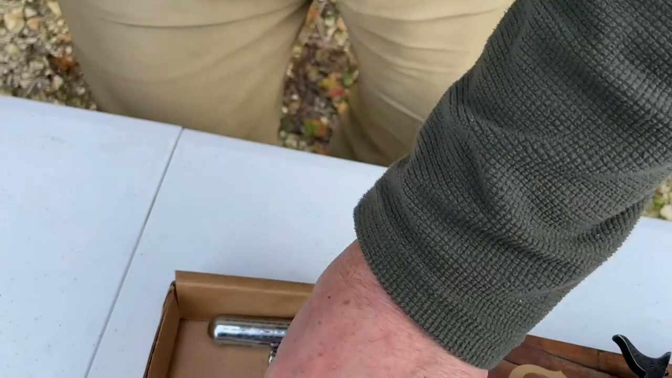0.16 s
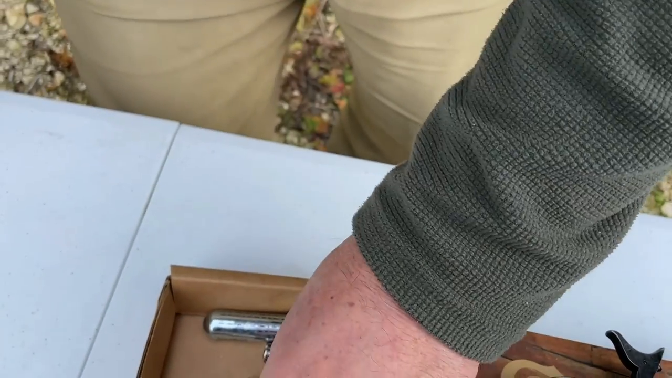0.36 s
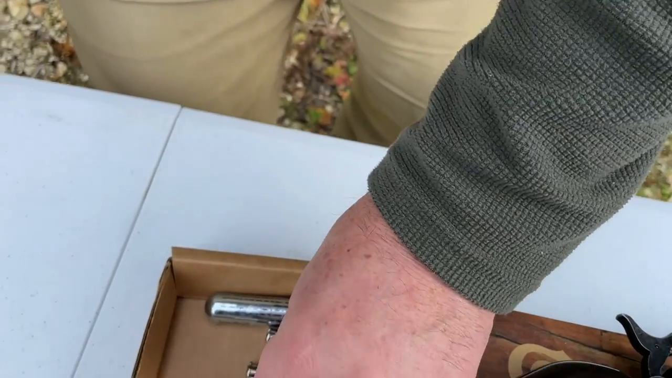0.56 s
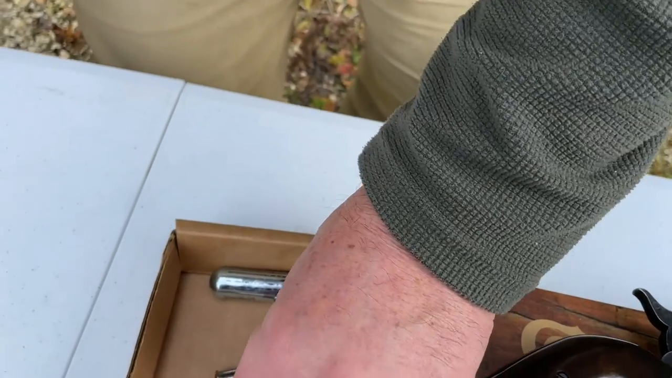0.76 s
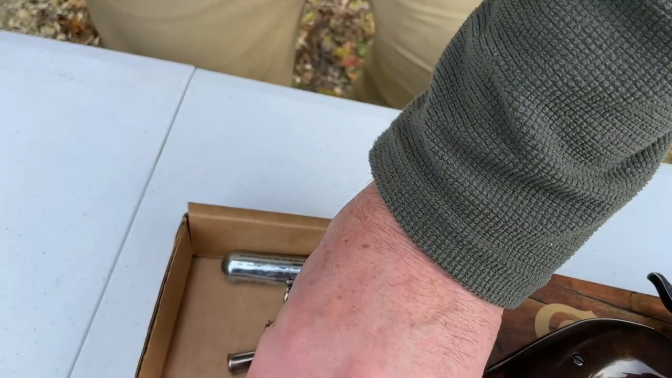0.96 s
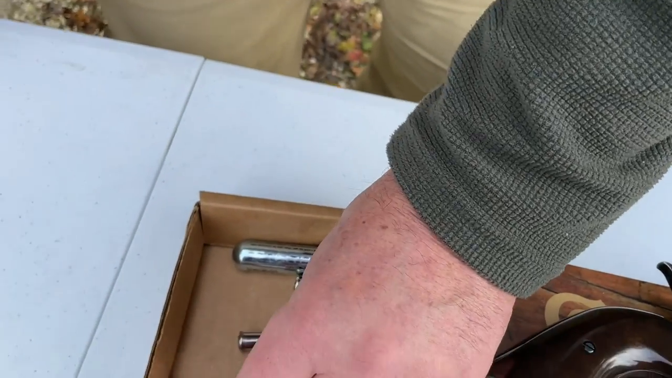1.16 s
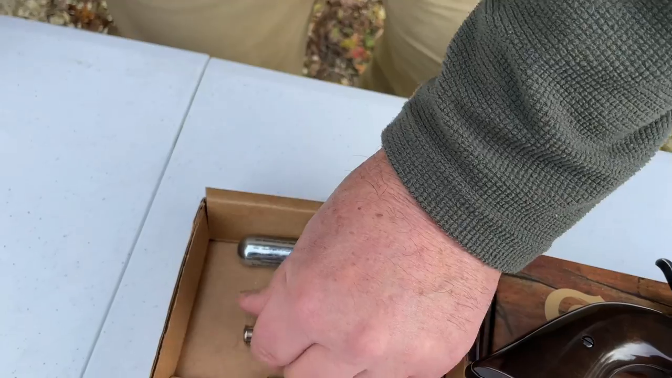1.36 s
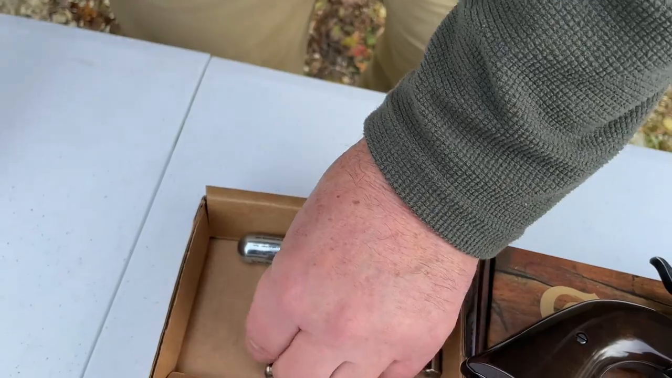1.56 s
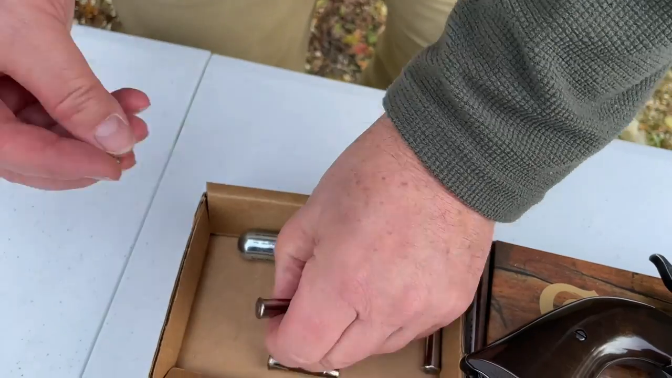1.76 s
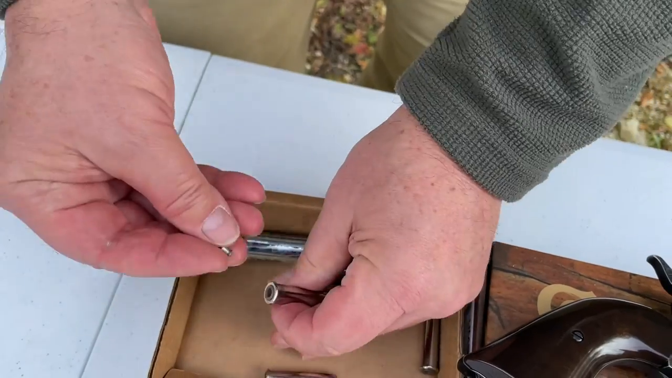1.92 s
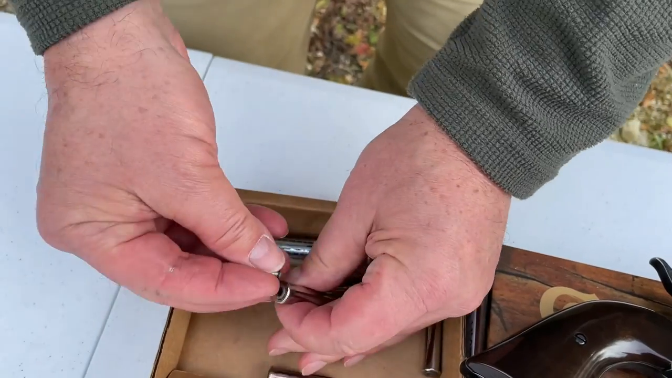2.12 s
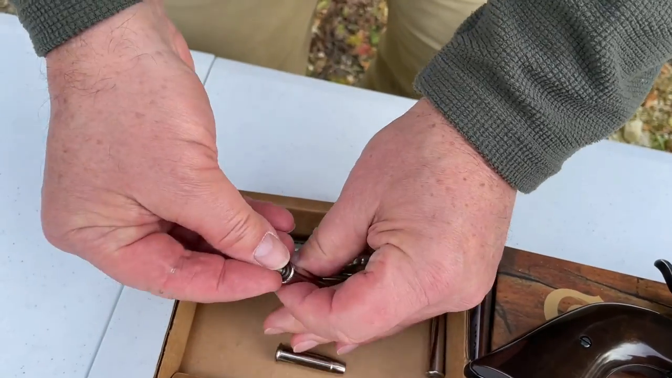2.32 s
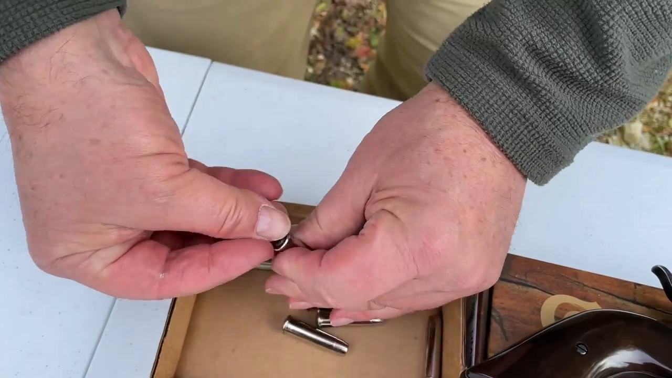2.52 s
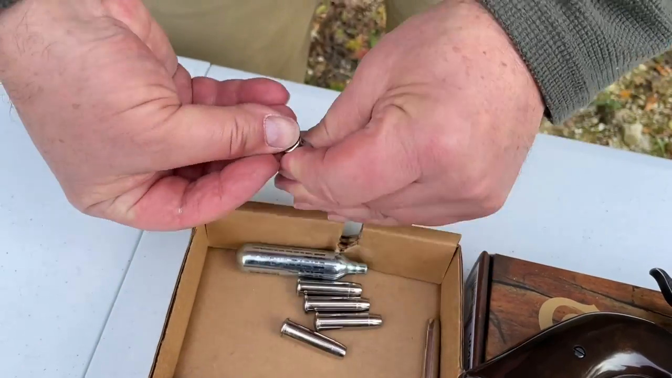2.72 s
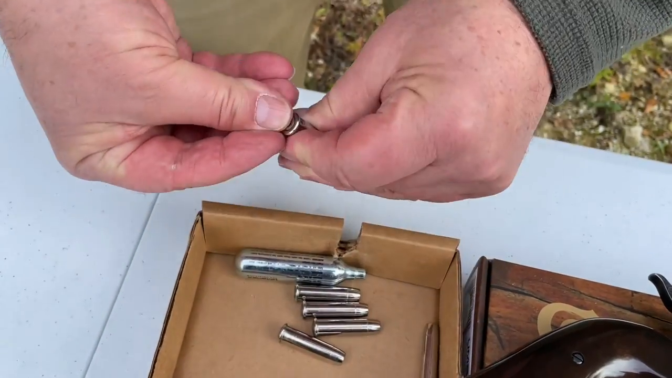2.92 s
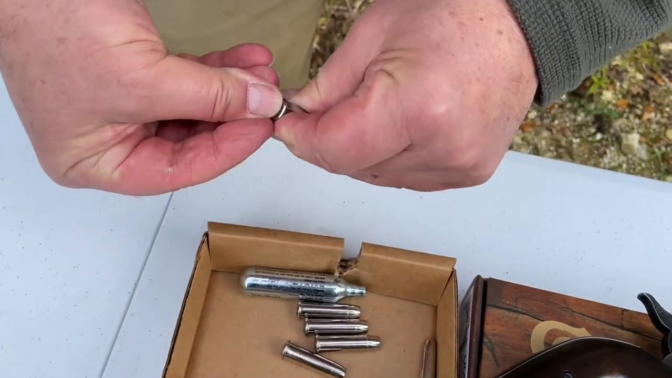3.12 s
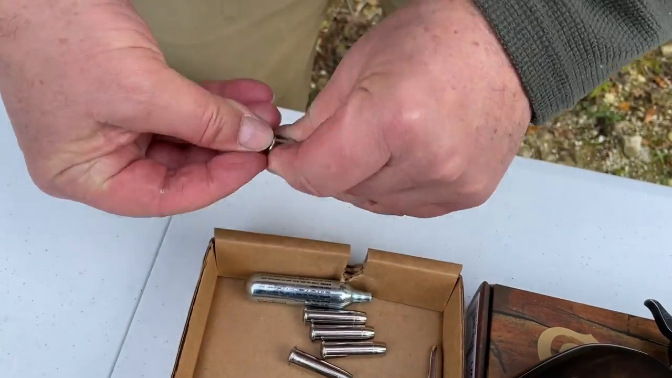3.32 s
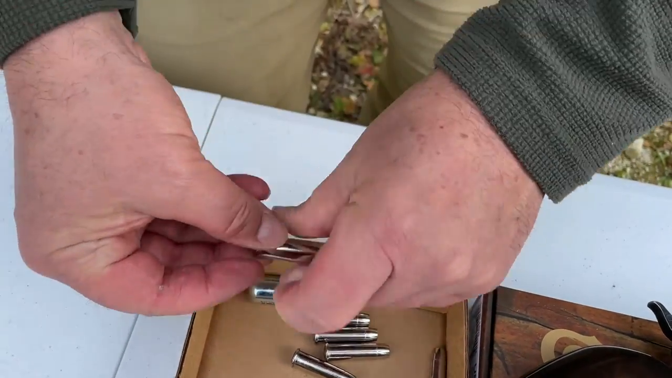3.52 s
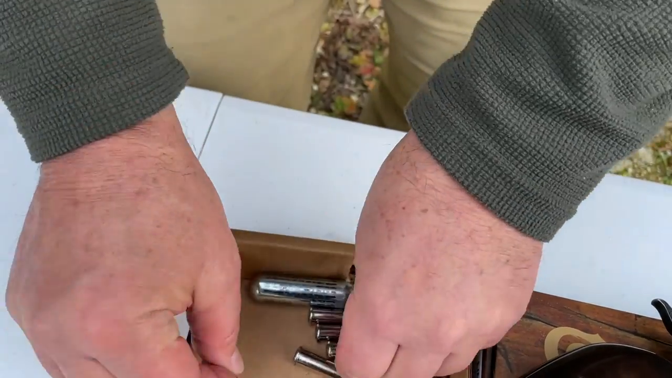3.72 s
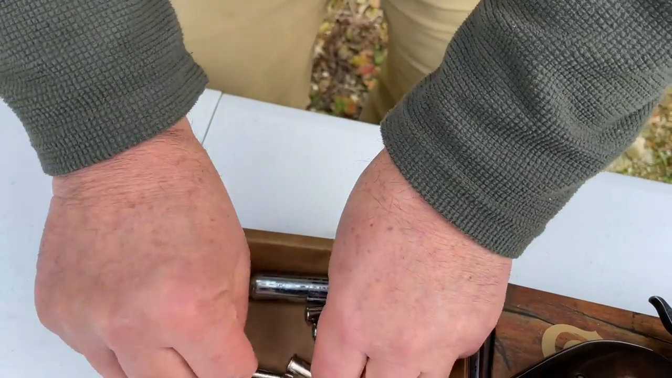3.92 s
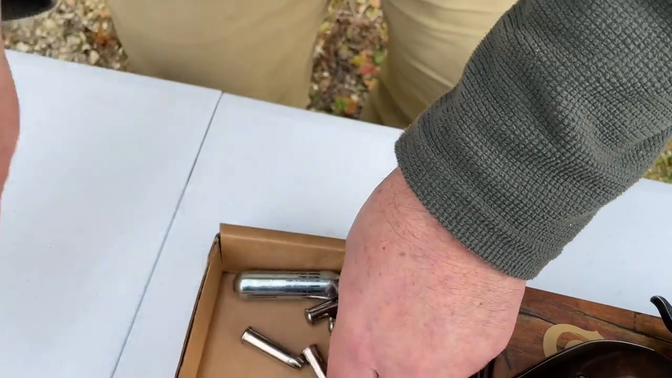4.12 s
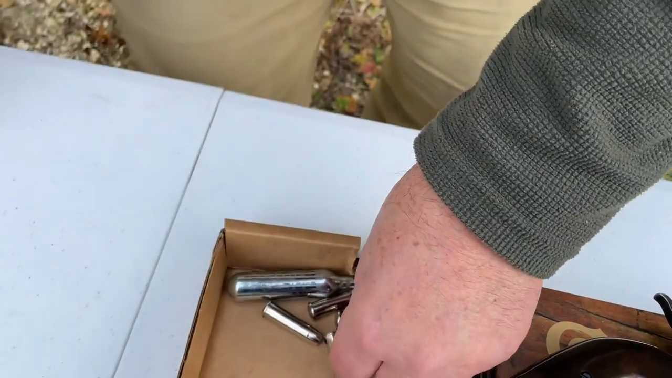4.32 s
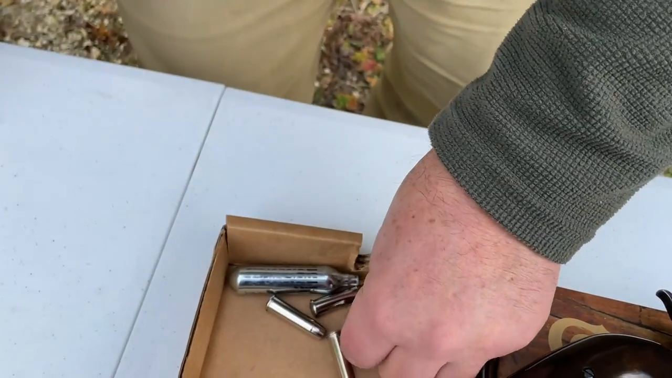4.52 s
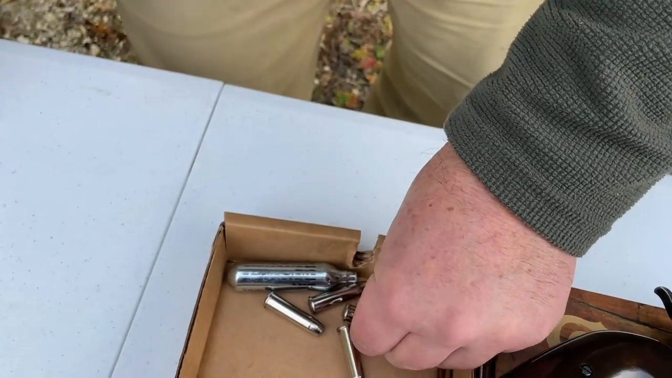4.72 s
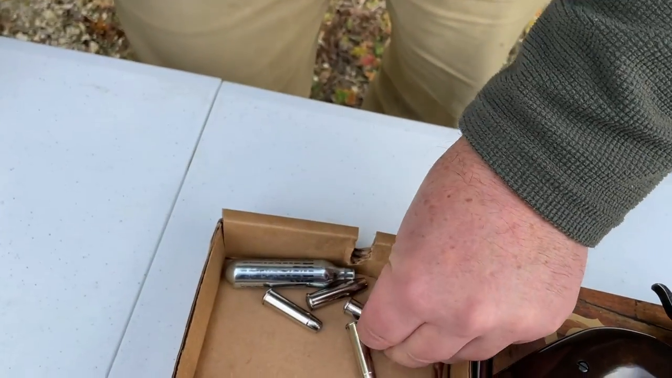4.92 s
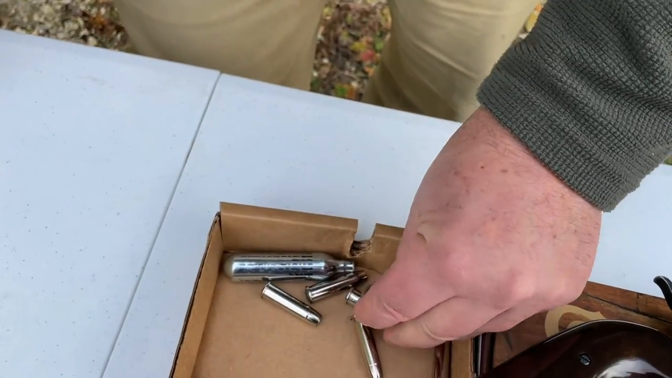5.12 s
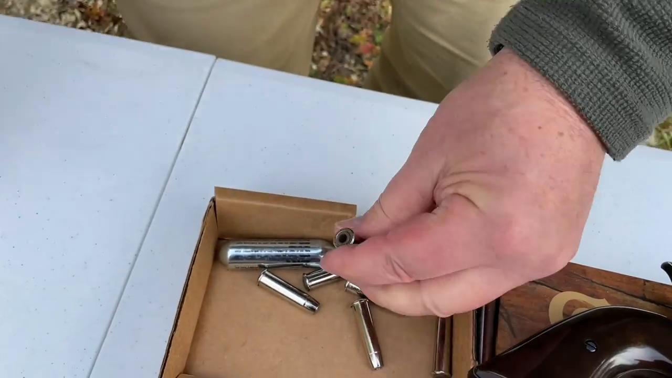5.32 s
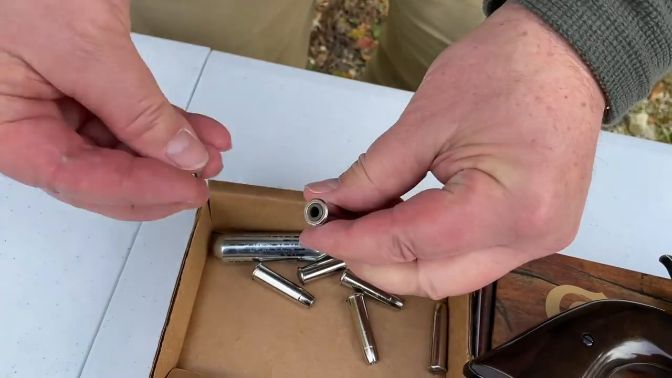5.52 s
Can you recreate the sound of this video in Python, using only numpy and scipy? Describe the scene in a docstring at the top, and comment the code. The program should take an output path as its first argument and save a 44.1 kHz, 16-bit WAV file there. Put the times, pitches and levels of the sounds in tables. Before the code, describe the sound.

Fingers sort thin metal cases in a cardboard box: gritty drags, sharp rim snaps, hollow thumps and high, short ringing clinks over faint outdoor air.

```python
"""Metal cartridge cases clink on one bright shell tone, knock on a cardboard box and scrape across its floor.
Fingers pick over them on a plastic table outdoors, with a faint wash and light air on the microphone behind.
Clinks are dying sines with a noisy contact tick; knocks ring box and table modes with a dull thud and rumble.
Scrapes are coloured trains of tiny slips, smooth when fast and bunched when slow; caught rims snap.
The background is coloured noise in a low and a high band."""
import sys
import numpy as np
from scipy import signal
from scipy.fft import rfft, irfft, next_fast_len
from scipy.io import wavfile
from scipy.ndimage import uniform_filter1d

SR = 44100
rng = np.random.default_rng(int(sys.argv[2]) if len(sys.argv) > 2 else 0)


def waveform_to_disk(signal):
    """Save audio, clipped to [-1, 1], as 16-bit WAV at the path in sys.argv[1]."""
    frames = np.transpose(np.atleast_2d(signal))
    scaled = np.clip(frames, -1, 1) * 32767
    samples = np.round(scaled).astype(np.int16)
    wavfile.write(sys.argv[1], SR, samples)


N = 250114
TIME = np.arange(N) / SR
CUTOFF_HZ = 17000

# cases set down on the box floor:
# t/s, box level/dB, table level/dB, contact hardness/(dB per octave), rim snap level/dB
KNOCKS = [(.970, -33, -29, -1, -40), (1.0633, -17, -24.5, -6, -22.5), (1.0872, -1.5, -18, 0, -10.5),
          (1.475, -30, -25.5, 5.5, -26), (1.599, -27.5, -25.5, -2.5, -30), (2.42, -36, -30, -6.5, -45),
          (2.471, -28.5, -29.5, -5.5, -30), (3.788, -20.5, -14.5, 7, -22), (3.815, -29, -24, 9, -36),
          (3.8877, -8, -11.5, -1.5, -7), (3.9338, -10.5, -29, -1, -7.5), (3.957, -15.5, -42, 0, -21),
          (4.1577, -19.5, -20, 8, -21), (4.3631, -29, -23, -3, -9), (4.397, -33, -31, 9, -13),
          (4.7019, -13.5, -18.5, -5.5, -14), (4.710, -16.5, -28, -4.5, -18), (4.753, -26.5, -23.5, -5, -31),
          (4.819, -23, -32, 3.5, -20), (5.0691, -17.5, -35, 1, -8.5)]
# two long drags over the cardboard, speed given as rasp level: t/s, level/dB
FIRST_DRAG = [(0, -34.5), (.06, -31.5), (.2, -31), (.24, -25), (.28, -28.5), (.35, -40.5), (.5, -40.5),
              (.56, -53), (.665, -39.5), (.74, -60)]
SECOND_DRAG = [(4.33, -50), (4.39, -43), (4.44, -28), (4.56, -30), (4.66, -35.5), (4.71, -34.5),
               (4.78, -41), (4.84, -33), (4.90, -60)]


def from_db(db):
    """Decibels to gain."""
    return 10 ** (np.asarray(db) / 20)


def rms_one(x):
    """Scale to rms 1."""
    return x / np.sqrt(np.mean(x ** 2) + 1e-20)


def add(track, s, sound):
    """Mix a sound into a track at time s."""
    at = max(round(s * SR), 0)
    track[at:at + len(sound)] += sound[:N - at]


def drift(rate):
    """Smooth random wander of rms 1, through a new random value `rate` times a second."""
    return rms_one(np.interp(TIME * rate, np.arange(3000), rng.standard_normal(3000)))


def colour(x, spectrum, tilt_db=0):
    """Causal (minimum-phase) filter through the spectrum's points, tilted about 4 kHz."""
    size = 2 * next_fast_len(len(x))
    hz = np.maximum(np.arange(size // 2 + 1) * SR / size, 1)
    points = np.array(spectrum)
    db = np.interp(np.log(hz), np.log(points[:, 0]), points[:, 1])
    db = db + tilt_db * np.tanh(np.log(hz / 4000))
    # folding the cepstrum forward in time gives the minimum phase
    cepstrum = irfft(np.log(from_db(db)))[:size // 2]
    cepstrum[1:] *= 2
    response = np.exp(rfft(cepstrum, size))
    return irfft(rfft(x, size) * response)[:len(x)]


def decay(t, t60):
    """Exponential fade, 60 dB down after t60 seconds."""
    return from_db(-60 * t / t60)


def mode(t, hz, t60):
    """A struck mode: a dying sine."""
    return np.sin(2 * np.pi * hz * t) * decay(t, t60)


def contact(spectrum, tilt_db, crush, crush_t60, tail_db, tail_t60):
    """A sharp contact, a few ms of crushing, and a scatter off the box walls, at one fixed energy."""
    t = TIME[:4096]
    scatter = from_db(tail_db) * decay(t, tail_t60)
    rise = 1 - np.exp(-t / 0.00031)
    push = rng.standard_normal(len(t)) * crush * (decay(t, crush_t60) + scatter) * rise
    push[10] += 1
    # level out the push's own spectrum, so the material alone sets the colour
    hz = np.geomspace(100, CUTOFF_HZ, 64)
    power = uniform_filter1d(np.abs(rfft(push)) ** 2, size=60)
    uneven_db = 10 * np.log10(np.interp(hz * len(t) / SR, np.arange(len(power)), power))
    even_push = colour(push, np.column_stack([hz, -uneven_db]))
    sound = colour(even_push, spectrum, tilt_db)
    return 3 * sound / np.linalg.norm(sound)


def outdoors():
    """Coloured noise split at 300 Hz: lumpy low air on the microphone under an even, distant wash."""
    # background colour: f/Hz, level/dB (relative within each band)
    background_colour = [(14, -0.5), (30, -10), (50, -15), (100, -18), (130, -20.5), (175, -18),
                         (260, -23.5), (380, -33.5), (620, -33), (800, -28.5), (1050, -30.5), (4000, -39.5),
                         (9400, -43.5), (12500, -56)]
    # low air on the microphone: t/s, level/dB
    air_level = [(0, -35), (.7, -35), (1.3, -34.5), (2.5, -40.5), (3.3, -39.5), (4.25, -33.5), (5.2, -37.5),
                 (5.67, -36.5)]
    # distant outdoor wash: t/s, level/dB
    wash_level = [(0, -42), (.85, -43.5), (1.95, -45), (2.9, -48), (3.6, -48), (4.1, -44), (5.3, -48)]
    noise = colour(rng.standard_normal(N), background_colour)
    low = signal.sosfilt(signal.butter(2, 300, "low", fs=SR, output="sos"), noise)
    high = signal.sosfilt(signal.butter(2, 300, "high", fs=SR, output="sos"), noise)
    air_db = np.interp(TIME, *np.transpose(air_level)) + 1.65 * drift(17)
    wash_db = np.interp(TIME, *np.transpose(wash_level))
    # the bands meet in opposite phase, so the wash is subtracted
    return rms_one(low) * from_db(air_db) - rms_one(high) * from_db(wash_db)


def grains(per_s, spread_db):
    """Tiny slips of uneven size and random sign."""
    sizes = from_db(spread_db * np.minimum(rng.exponential(1, N), 4.5)) * rng.choice([-1, 1], N)
    return sizes * (rng.random(N) < per_s / SR)


def drags():
    """Metal slides over paper fibres in tiny slips, which bunch up as the slide slows."""
    # colour of the rasp of case on cardboard: f/Hz, level/dB (relative)
    rasp_colour = [(150, -0.5), (1400, -11), (2000, -3.5), (2550, 1), (3200, -4), (3650, 0), (4200, -8.5),
                   (5050, 0), (5950, -4), (6600, -2.5), (9000, -19), (16000, -41.5)]
    # colour of the fine, bright grit: f/Hz, level/dB (relative)
    grit_colour = [(500, -24), (4500, -21.5), (7000, -2), (9800, 2), (12000, -13), (16000, -19.5)]
    # brief nudges: t/s of the fastest moment, length/s, rasp level/dB, grit against rasp level/dB
    nudges = [(1.495, .17, -44, -1.5), (1.985, 0.064, -46, -2.5), (4.15, 0.23, -40.5, -6)]
    nudge_swell_db, nudge_stick_db = 15.5, 6
    first_grit_db, second_grit_db = -5.5, -3  # fine grit against the rasp
    first_smooth_db, second_smooth_db = -31.5, -27  # speed above which a slide runs smoothly
    stick_db_per_db, drag_stick_db = 1.0, 12  # the slower a slide, the more it sticks and slips
    roll_db, rolls_per_s = 1.5, 66  # a case rolls as it slides, so rasp and grit waver separately

    slips = grains(per_s=12000, spread_db=2.5)
    rasp = rms_one(colour(slips, rasp_colour) * from_db(roll_db * drift(rolls_per_s)))
    grit = rms_one(colour(slips, grit_colour) * from_db(roll_db * drift(rolls_per_s)))
    bunches = np.minimum(drift(380), 2.2)

    def slide(curve, grit_db, smooth_db, max_stick_db):
        """One slide along a speed curve, gripping harder as it slows."""
        s, db = np.transpose(curve)
        speed_db = np.interp(TIME, s, db)
        stick_db = np.clip(stick_db_per_db * (smooth_db - speed_db), 0, max_stick_db)
        grip = from_db(stick_db * bunches)
        grip /= np.sqrt(uniform_filter1d(grip ** 2, size=1300))  # bunching moves energy, it adds none
        moving = (TIME > s[0]) & (TIME < s[-1])
        return moving * grip * from_db(speed_db) * (rasp + from_db(grit_db) * grit)

    out = slide(FIRST_DRAG, first_grit_db, first_smooth_db, drag_stick_db)
    out += slide(SECOND_DRAG, second_grit_db, second_smooth_db, drag_stick_db)
    for s, length, db, grit_db in nudges:
        # the case speeds up and slows again
        edge_db = db - nudge_swell_db
        swell = [(s - length / 2, edge_db), (s, db), (s + length / 2, edge_db)]
        out += slide(swell, grit_db, second_smooth_db, nudge_stick_db)
    return out


def snap(db, tilt_db):
    """A rim catches on the cardboard and lets go: a sharp contact in the colour of the board."""
    # colour of a snap: f/Hz, level/dB (relative)
    snap_colour = [(100, -17.5), (500, -7.5), (1450, -6.5), (2000, 4), (2480, 4.5), (3100, -1), (3700, 2.5),
                   (5000, -6.5), (9500, -6.5), (12500, -18), (16000, -23)]
    return from_db(db) * contact(snap_colour, tilt_db, crush=0.21, crush_t60=0.0075,
                                 tail_db=-12.5, tail_t60=0.053)


def catches():
    """Rims catch lightly at uneven intervals wherever a drag is slow."""
    catches_per_s, catch_below_db = 42, -31.5  # average rate; drag speed as rasp level
    catch_db, spread_db, tilt_spread_db = -21.5, 1, 1
    out = np.zeros(N)
    for drag in (FIRST_DRAG, SECOND_DRAG):
        s, speed_db = np.transpose(drag)
        times = s[0] + np.cumsum(rng.gamma(3, 1 / 3, size=60)) / catches_per_s
        for at, (strength, tilt) in zip(times, rng.standard_normal((len(times), 2))):
            sound = snap(catch_db + spread_db * strength, tilt_spread_db * tilt)
            if at < s[-1] and np.interp(at, s, speed_db) < catch_below_db:
                add(out, at, sound)
    return out


def snaps():
    """Rims catch hard on the cardboard, and the rim of each case set down snaps too."""
    # hard catches: t/s, level/dB, treble tilt/dB
    hard_catches = [(.221, -9.5, 1), (.283, -18.5, -11), (.432, -18.5, 5), (.466, -14, -1), (.476, -18, -2),
                    (.487, -8, -2.5), (.493, -10.5, 0), (.529, -15.5, 1), (.578, -17.5, -6),
                    (.604, -8, -5.5), (.621, -14, -12), (.654, -8, -6), (.692, -12, -3.5),
                    (.702, -16.5, -11), (3.927, -20, 10), (3.972, -19, 10), (4.41, -9.5, 8),
                    (4.4318, -5.5, 4), (4.669, -12.5, -6), (4.819, -9, -7.5), (4.831, -13, -18),
                    (4.856, -10, -7), (4.882, -21, -6), (5.095, -15, 4), (5.150, -14, -2.5)]
    rim_tilt_db = 5.5
    rims = [(s, rim_db, rim_tilt_db) for s, *_, rim_db in KNOCKS]
    out = np.zeros(N)
    for s, db, tilt_db in [*hard_catches, *rims]:
        add(out, s - .0005, snap(db, tilt_db))
    return out


def knocks():
    """A dull push sets box and table ringing; a soft contact spares the high modes."""
    # modes of the cardboard box: f/Hz, level/dB, t60/s
    box_modes = [(458, -21, .09), (540, -22, .07), (703, -13, .07), (798, -14, .095), (960, -23, .06),
                 (1175, -16, .05), (1410, -17, .04), (1680, -19, .035), (2420, -23, .025)]
    # modes of the table under the box: f/Hz, level/dB, t60/s
    table_modes = [(77, -8.5, 0.36), (100.2, -5.5, 0.16), (120, -8.5, .13), (166.4, -9, 0.16),
                   (210.7, -20, 0.16)]
    # colour of the dull push: f/Hz, level/dB
    thud_colour = [(60, -7), (180, -6), (380, 1), (520, 1), (780, 1), (1100, -3), (1720, -4.5), (2000, -26),
                   (3500, -19), (9000, -49.5)]
    rumble_colour = [(50, -9.5), (110, -1.5), (420, -8.0), (1000, -16.5), (4000, -49.5)]  # f/Hz, level/dB
    out, t = np.zeros(N), TIME[:SR // 2]
    for s, box_db, table_db, hardness, _ in KNOCKS:
        # levels and pitches vary a little from knock to knock; neighbouring modes alternate in sign
        box = np.zeros(len(t))
        for k, (hz, level, t60) in enumerate(box_modes):
            gain = from_db(level + hardness * np.log2(hz / 800) + rng.normal(0, 1))
            box += (-1) ** k * gain * mode(t, hz * rng.normal(1, 0.007), t60)
        table = np.zeros(len(t))
        for k, (hz, level, t60) in enumerate(table_modes):
            gain = from_db(level + rng.normal(0, 1))
            table += (-1) ** k * gain * mode(t, hz * rng.normal(1, 0.0186), t60)
        # the first push, then the loose contents shake briefly
        push = 1.65 * rng.standard_normal(len(t)) * decay(t, 0.1)
        push[0] += 22
        thud = colour(push, [(hz, db + hardness * np.log2(hz / 800)) for hz, db in thud_colour])
        # a low, fading rumble of filtered noise follows each knock
        rumble = colour(rng.standard_normal(len(t)) * decay(t, 0.37), rumble_colour)
        box_sound = from_db(box_db) * (box + from_db(-5.5) * thud)
        low_sound = from_db(table_db) * (table + from_db(10.5) * rumble)
        add(out, s, box_sound + low_sound)
    return out


def clinks():
    """Thin shells ring on one tone; a new blow stops that tone's last ring."""
    # case against case: t/s, shell tone level/dB, shell tone f/Hz, t60/s, upper mode level/dB, tick level/dB
    blows = [(1.527, -13.5, 8430, .022, -45, -20), (1.558, -17, 8800, 0.026, -54, -21),
             (1.589, -1.5, 8500, .082, -41, -8.5), (1.599, -1.5, 8500, 0.0485, -41, -8.5),
             (1.614, -16.5, 8472, 0.087, -41, -34), (2.4714, -13.5, 8400, .058, -30, -11.5),
             (2.4953, -16, 8480, 0.063, -48, -25), (3.746, -18.5, 8440, .021, -47, -14.5),
             (3.756, -20.5, 8420, .15, -54, -14.5), (3.854, -17.5, 8430, .076, -55, -14.5),
             (4.1578, -47, 8400, .08, -9.5, -10), (4.19, -17, 8200, .008, -46, -15),
             (4.259, -6, 8420, 0.073, -23, -10), (4.3015, -14, 8470, 0.098, -30, -18)]
    # short-lived neighbours of the shell tone, from the other case in the blow: f/Hz, level/dB, t60/s
    neighbours = [(8530, -9.5, 0.031), (7920, -27.5, .026)]
    # colour of the contact tick: f/Hz, level/dB (relative)
    tick_colour = [(200, -13), (2000, -4), (4000, 0), (6500, 3), (8000, -4), (9300, 3.5), (10800, -12.5),
                   (12500, -20), (16000, -17)]
    upper_hz, upper_t60_s = 14155, 0.066  # upper shell mode
    out, t = np.zeros(N), TIME[:SR // 4]
    next_blows = [row[0] for row in blows[1:]] + [TIME[-1]]
    for (s, db, hz, t60, upper_db, tick_db), next_s in zip(blows, next_blows):
        # a shell is never quite round: its tone is a close pair, a strong one and a weak one that beat together
        pair = mode(t, hz, t60) + 0.12 * mode(t, hz + rng.uniform(-130, 130), t60)
        other = sum(from_db(level) * mode(t, near_hz * rng.normal(1, .006), near_t60)
                    for near_hz, level, near_t60 in neighbours)
        shell = from_db(db) * (pair + other)
        upper = from_db(upper_db) * mode(t, upper_hz, upper_t60_s)
        held = np.clip((next_s - s - t) / 0.00099, 0, 1)
        # a case rocking against its neighbours rings unevenly
        rocking = from_db(2.154 * np.interp(t * 250, np.arange(100), rng.standard_normal(100)))
        onset = 1 - np.exp(-t / .0005)
        add(out, s, (shell * held + upper) * rocking * onset)
        tick = contact(tick_colour, 0, crush=0.22, crush_t60=0.0088, tail_db=-13.5, tail_t60=0.067)
        add(out, s - .0003, from_db(tick_db) * tick)
    return out


def scene():
    """All layers summed to one channel: open air, cardboard scrapes and snaps, knocks, clinks."""
    return (outdoors() + drags() + catches() + snaps() + knocks() + clinks())[None]


def record(dry):
    """Peaks clip just below full scale, then a steep low-pass cuts the top."""
    clipped = np.clip(dry, -.95, .95)
    return signal.sosfilt(signal.cheby2(20, 80, CUTOFF_HZ, fs=SR, output="sos"), clipped)


dry = scene()
out = record(dry)
waveform_to_disk(out)
```